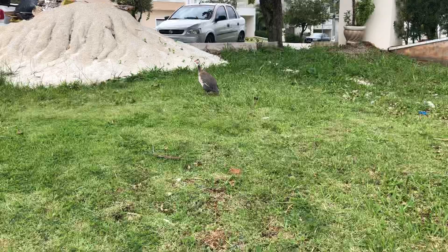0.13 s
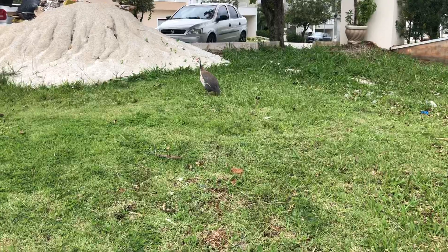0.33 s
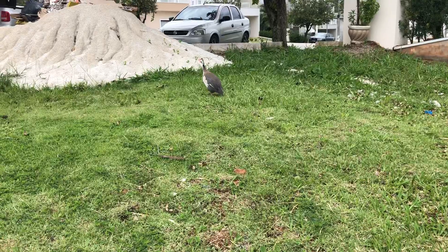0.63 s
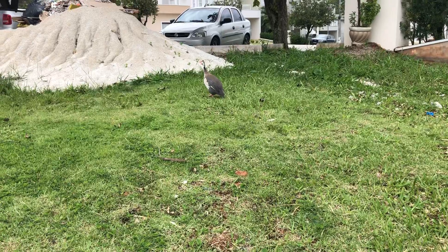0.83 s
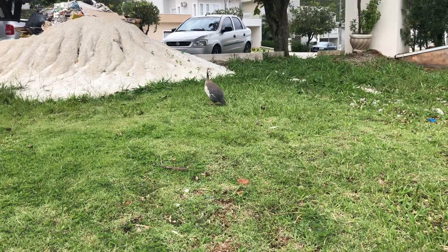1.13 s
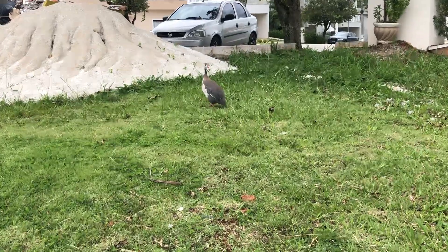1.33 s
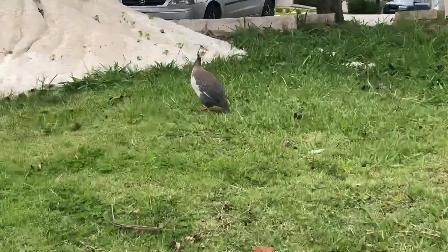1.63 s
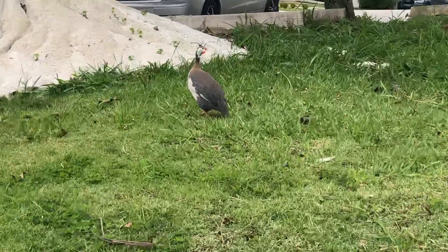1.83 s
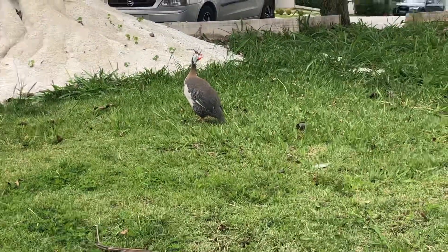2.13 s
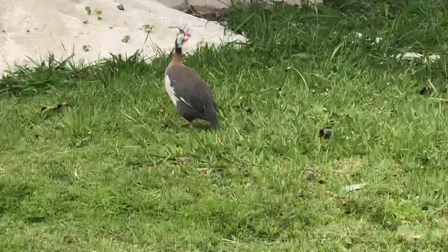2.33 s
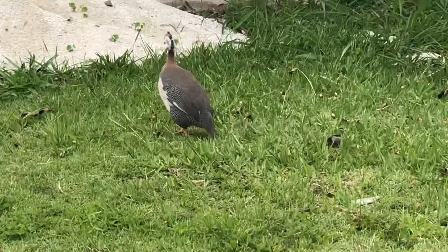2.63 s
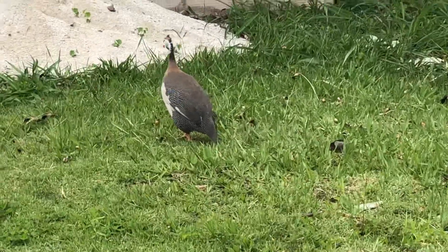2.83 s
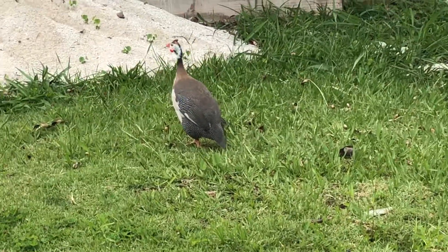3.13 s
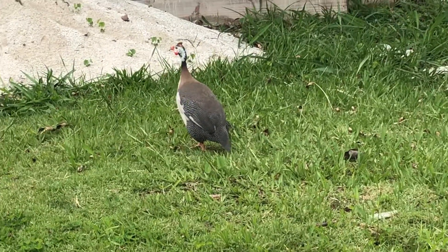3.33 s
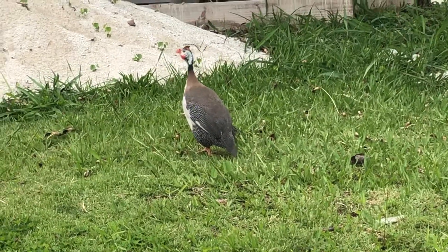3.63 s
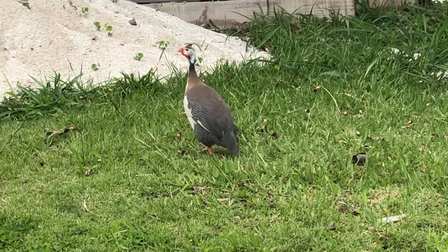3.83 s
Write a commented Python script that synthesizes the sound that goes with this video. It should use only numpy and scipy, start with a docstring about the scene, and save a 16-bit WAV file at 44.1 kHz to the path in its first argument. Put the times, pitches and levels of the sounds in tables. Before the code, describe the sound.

A guinea fowl repeats a hoarse two-part call, short then long and louder, on a lawn outdoors.

```python
"""A guinea fowl on a lawn calls five times. Two voices, each a harmonic tone, open the call with a short
hoarse note; faint peeps and thin squeaks follow, then a long loud note: a clear tone that swells, then breaks
into a rasp of pulses ringing throat resonances, joined by a lower voice. Wall echoes and a scattered tail follow.
Noise-band lisps and two faint pips come from a far small bird in the later part.
Traffic, shaped noise with an engine hum of narrow noise bands, rumbles throughout."""
import sys
import numpy as np
from scipy import signal
from scipy.fft import rfft, irfft
from scipy.io import wavfile
from scipy.ndimage import uniform_filter1d

SR = 44100
rng = np.random.default_rng(int(sys.argv[2]) if len(sys.argv) > 2 else 0)


def log_audio(samples):
    """Write samples as a 16-bit WAV file to the path given in sys.argv[1]."""
    # one column per channel
    frames = np.atleast_2d(samples).T
    # limit to full scale, then quantise
    limited = np.clip(frames, -1, 1)
    pcm = np.round(limited * 32767).astype(np.int16)
    wavfile.write(sys.argv[1], SR, pcm)


N = 176400
NOTE_T = np.arange(SR // 4) / SR  # s, time within one note


def from_db(db):
    """Decibels to gain."""
    return 10 ** (np.asarray(db) / 20)


def rms_one(x):
    """Scale to unit rms."""
    return x / np.sqrt(np.mean(x ** 2) + 1e-20)


def add(out, start_s, x):
    """Mix x in at start_s."""
    i = int(start_s * SR)
    out[i:i + len(x)] += x[:len(out) - i]


def coloured(x, points):
    """Filter x by a curve of (Hz, dB) points, then scale to unit rms."""
    hz, db = np.transpose(points)
    f = np.maximum(np.fft.rfftfreq(len(x), 1 / SR), 1)
    gain = from_db(np.interp(np.log(f), np.log(hz), db))
    return rms_one(irfft(rfft(x) * gain, len(x)))


def band_noise(hz, width_hz, size):
    """Unit-rms noise in a bell-shaped band; around 0 Hz it is a random wander."""
    f = np.fft.rfftfreq(size, 1 / SR)
    bell = np.exp(-2 * ((f - hz) / width_hz) ** 2)
    return rms_one(irfft(rfft(rng.standard_normal(size)) * bell, size))


def resonate(x, hz, width_hz):
    """Two-pole resonance with unit gain at its peak."""
    r = np.exp(-np.pi * width_hz / SR)
    zeros = np.array([1, 0, -1]) * (1 - r * r) / 2
    poles = [1, -2 * r * np.cos(2 * np.pi * hz / SR), r * r]
    return signal.lfilter(zeros, poles, x + 1e-18)


def lowpass(x, cut_hz):
    """Second-order low-pass."""
    return signal.sosfilt(signal.butter(2, cut_hz, fs=SR, output="sos"), x)


def envelope(length_s, attack_s, release_s):
    """Smooth attack, hold, and a release centred on the note's end."""
    rise = np.sin(np.pi / 2 * np.clip(NOTE_T / attack_s, 0, 1)) ** 2
    fall = np.sin(np.pi / 2 * np.clip((length_s - NOTE_T) / release_s + .5, 0, 1)) ** 2
    return rise * fall


ATTACK_S, RELEASE_S = 0.0072, 0.0041
CHIRP_HZ, CHIRP_DB, CHIRP_LEAD_S, CHIRP_S = 2255, -57.5, .009, 0.019

# Short notes. Each row: start in seconds, length in s, upper voice length in s, upper level in dB,
# lower start pitch in Hz, lower level in dB, lower roughness 0-1, rasp level in dB.
SHORT_NOTES = [(0.274, 0.033, 0.031, -42, 946, -48.5, .8, -42),
               (1.062, 0.036, 0.021, -42, 961, -41.5, 0, -44.5),
               (1.873, 0.045, 0.039, -39, 946, -47.5, 0.47, -42),
               (2.724, 0.039, 0.026, -40, 956, -48.5, 0.66, -41.5),
               (3.507, 0.039, 0.014, -38.5, 941, -38.5, 0.31, -48)]
# Long notes. Each row: start in seconds, break after s, length in s, clear pitch and level midway to the break
# in Hz and dB, pitch at the break in Hz, level after it in dB, lower voice in dB, rasp in dB before its offset,
# hiss in dB from the break on, start offset in dB (hiss, rasp and undertone).
LONG_NOTES = [(0.443, 0.033, 0.086, 1603, -31, 1481, -36.5, -46, -38.5, -55, -4),
              (1.235, 0.048, 0.097, 1591, -32.5, 1619, -35.5, -38.5, -37, -55, -7),
              (2.058, 0.045, 0.095, 1605, -29.5, 1480, -29.5, -42.5, -38.5, -51.5, -4),
              (2.913, .030, .090, 1614, -28, 1622, -32.5, -37.5, -37.5, -50.5, -3),
              (3.681, .054, .100, 1622, -28.5, 1657, -37.5, -37, -37, -49.5, -13)]
# Thin squeaks around the long notes' onsets.
# Each row: start in seconds, length in s, start pitch in Hz, glide in Hz per s, level in dB.
SQUEAKS = [(.433, 0.02, 2835, 0, -52.5), (1.194, 0.017, 2810, 0, -58), (1.219, 0.022, 2800, 500, -56.5),
           (2.009, 0.009, 2827, 8, -53.5), (2.045, 0.018, 2840, 4, -54), (2.893, 0.027, 2880, -500, -51.5),
           (3.672, .018, 3160, 12000, -57)]
# Soft peeps between short and long notes. Each row: as for the squeaks.
PEEPS = [(.388, 0.014, 1290, 0, -58.5), (1.202, 0.013, 1590, -1000, -47.5),
         (1.203, 0.028, 1276, -3000, -53.5), (2.015, .016, 1630, -17000, -46.5),
         (2.861, 0.011, 1320, -9000, -52), (2.901, 0.013, 1440, 0, -43.5),
         (3.630, 0.016, 1345, -3000, -58.5)]
# Harmonics of squeak and peep, from the first up. Each entry: relative level in dB.
SQUEAK_HARMONICS = [3.5, -4, -21.5, -31]
PEEP_HARMONICS = [0, -26, -27, -22]


def guinea_fowl():
    """Place the bird's notes; chirps, squeaks and peeps are single short membrane tones."""
    out = np.zeros(N)
    for start_s, *note in SHORT_NOTES:
        chirp = voice(CHIRP_HZ, 0, [0], rough=0.27) * envelope(CHIRP_S, ATTACK_S, RELEASE_S)
        add(out, start_s - CHIRP_LEAD_S, from_db(CHIRP_DB) * chirp)
        add(out, start_s, short_note(*note))
    for start_s, *note in LONG_NOTES:
        add(out, start_s, long_note(*note))
    for table, harmonics in ((SQUEAKS, SQUEAK_HARMONICS), (PEEPS, PEEP_HARMONICS)):
        for start_s, length_s, hz, glide_hz_per_s, db in table:
            tone = voice(hz, glide_hz_per_s, harmonics, rough=0.087)
            add(out, start_s, from_db(db) * tone * envelope(length_s, attack_s=0.0056, release_s=0.014))
    return out


LOWER_HZ, LOWER_RISE_HZ_PER_S, LOWER_LEAD_S = 969, 800, 0.003154
CLEAR_RISE_HZ_PER_S, CLEAR_SWELL_DB_PER_S = 450, 66
BROKEN_RISE_HZ_PER_S, BROKEN_EARLY_END_S = 900, 0.0059
RASP_OFFSET_DB, HISS_RELEASE_S = -2.5, 0.061
CATCH_HZ, CATCH_DB, CATCH_S = 1239, -38, 0.012  # brief undertone; level before the start offset

# Harmonics of the clear tone, upper and lower voice, from the first up. Each entry: relative level in dB.
CLEAR_HARMONICS = [0.5, -25, -26, -42, -54, -46, -52]
UPPER_HARMONICS = [1.5, -27, -28.5, -38.5, -52, -42.5, -49]
LOWER_HARMONICS = [-0.5, -7.5, -21.5, -35, -35.5, -34.5]


def long_note(break_s, length_s, clear_hz, clear_db, broken_hz, broken_db, lower_db, rasp_db, hiss_db, start_db):
    """A clear tone swells and roughens until it breaks; the lower voice and the rasp then take over."""
    out = np.zeros(len(NOTE_T))
    rasp, hiss = rattle()
    strain = np.clip(NOTE_T / break_s, 0, 1)
    after_s = length_s - break_s

    swell = from_db(clear_db + CLEAR_SWELL_DB_PER_S * break_s * (strain - .5))
    start_hz = clear_hz - CLEAR_RISE_HZ_PER_S * break_s / 2
    clear_rough = .06 + .16 * strain ** 2
    clear = voice(start_hz, CLEAR_RISE_HZ_PER_S, CLEAR_HARMONICS, rough=clear_rough, flutter_hz=520)
    add(out, 0, swell * clear * envelope(break_s + 0.0013, attack_s=0.0092, release_s=0.0031))

    undertone = voice(CATCH_HZ, 0, [0], rough=0.4) * envelope(CATCH_S, attack_s=0.0028, release_s=0.0076)
    add(out, 0, from_db(CATCH_DB + start_db) * undertone)

    broken = voice(broken_hz, BROKEN_RISE_HZ_PER_S, UPPER_HARMONICS, rough=.45)
    broken *= envelope(after_s - BROKEN_EARLY_END_S, ATTACK_S, release_s=0.0058)
    add(out, break_s, from_db(broken_db) * broken)

    lower = voice(LOWER_HZ, LOWER_RISE_HZ_PER_S, LOWER_HARMONICS, rough=0.091)
    lower *= envelope(after_s + LOWER_LEAD_S, attack_s=0.014, release_s=RELEASE_S)
    add(out, break_s - LOWER_LEAD_S, from_db(lower_db) * lower)

    # offset weight falls from 1.5 at the start to 0.5 at the break
    rasp_gain = from_db(rasp_db + (RASP_OFFSET_DB + start_db) * (1.5 - strain ** 2))
    add(out, 0, rasp_gain * rasp * envelope(length_s, ATTACK_S, release_s=0.025))
    hiss_gain = from_db(hiss_db + start_db * (1 - strain))
    add(out, 0, hiss_gain * hiss * envelope(length_s, ATTACK_S, HISS_RELEASE_S))
    return out


SHORT_UPPER_HZ = 1598
SHORT_HISS_DB, SHORT_HISS_CUT_HZ = -60, 7000  # level before the envelope


def short_note(length_s, upper_length_s, upper_db, lower_hz, lower_db, lower_rough, rasp_db):
    """Both voices sound together over a rasp and a soft, duller hiss; the upper may drop out early."""
    rasp, hiss = rattle()
    hiss = lowpass(hiss, SHORT_HISS_CUT_HZ)
    upper = from_db(upper_db) * voice(SHORT_UPPER_HZ, 0, UPPER_HARMONICS, rough=.35)
    upper *= envelope(upper_length_s, attack_s=.006, release_s=0.016)
    lower = from_db(lower_db) * voice(lower_hz, -300, LOWER_HARMONICS, rough=lower_rough)
    body = lower + from_db(rasp_db) * rasp + from_db(SHORT_HISS_DB) * hiss
    return upper + body * envelope(length_s, attack_s=0.016, release_s=0.01)


def voice(hz, glide_hz_per_s, harmonics, rough, jitter=0.037, shimmer_db=3, flutter_hz=420):
    """One vibrating membrane; roughness shakes its pitch and strength."""
    size = len(NOTE_T)
    pitch_hz = (hz + glide_hz_per_s * NOTE_T) * (1 + jitter * rough * band_noise(0, flutter_hz, size))
    phase = 2 * np.pi * np.cumsum(pitch_hz) / SR
    tone = sum(from_db(db) * np.sin((k + 1) * phase) for k, db in enumerate(harmonics))
    return rms_one(tone * from_db(shimmer_db * rough * band_noise(0, flutter_hz, size)))


RATTLE_PER_S, RATTLE_RISE_HZ_PER_S, RATTLE_JITTER = 312, 300, .035
BUZZ_SHARE = 0.54  # pulses mixed into the air noise

# Throat resonances under the rasp. Each row: frequency in Hz, width per pass in Hz, level in dB.
THROAT = [(363.4, 97, -11.5), (943, 124, -10), (1295, 203, 3), (1488, 123, -3), (1698, 160, -5),
          (1937, 57, -13.5), (2294, 230, -13)]
# Spectrum of the voice's hiss. Each row: frequency in Hz, relative filter gain in dB.
HISS = [(1000, -39), (2000, 2), (2600, 3), (2900, 4.5), (3100, -8), (3350, 1.5), (3900, -14), (4200, -9),
        (4480, -5), (4950, 3), (5500, 3), (6350, 0), (6800, -10), (8800, -23), (10200, -8), (11500, -13),
        (12800, -29), (15500, -22)]


def rattle(hiss_depth=0.43, uneven=0.63):
    """Uneven, quickening pulses ring the throat and chop the rushing air: returns evened rasp and hiss."""
    size = len(NOTE_T)
    rate_hz = RATTLE_PER_S + RATTLE_RISE_HZ_PER_S * NOTE_T
    rate_hz = rate_hz * (1 + RATTLE_JITTER * band_noise(0, 500, size))
    cycles = rng.random() + np.cumsum(rate_hz) / SR
    pulses = np.diff(np.floor(cycles), prepend=0) * (1 + uneven * rng.standard_normal(size))

    rasp = np.zeros(size)
    for k, (hz, width_hz, db) in enumerate(THROAT):
        ring = resonate(resonate(pulses, hz, width_hz), hz, width_hz)
        rasp += (-1) ** k * from_db(db) * ring  # neighbours in opposite polarity
    rasp = rms_one(rasp)
    rasp = rasp / np.sqrt(uniform_filter1d(rasp ** 2, size=700) + 0.0084)  # even the level

    air = rng.standard_normal(size) * (1 + hiss_depth * np.cos(2 * np.pi * cycles))
    return rasp, coloured(air + BUZZ_SHARE * rms_one(pulses), HISS)


GROUND_DIP_HZ, GROUND_DIP_WIDTH_HZ, GROUND_DIP_DEPTH = 2120, 330, 0.55


def lawn_bounce(x):
    """The bounce off the lawn cancels part of the direct sound in one band."""
    return x - GROUND_DIP_DEPTH * resonate(x, GROUND_DIP_HZ, GROUND_DIP_WIDTH_HZ)


NEAR_WALL_S, NEAR_WALL_DB, NEAR_WALL_HZ, NEAR_WALL_WIDTH_HZ = 0.025, -4.5, 1978.5, 280  # width per pass


def near_wall(x):
    """One early echo, narrowed by two resonance passes to about the band that the lawn cancels."""
    out = np.zeros(N)
    echo = resonate(x, NEAR_WALL_HZ, NEAR_WALL_WIDTH_HZ)
    echo = resonate(echo, NEAR_WALL_HZ, NEAR_WALL_WIDTH_HZ)
    add(out, NEAR_WALL_S, from_db(NEAR_WALL_DB) * echo)
    return out


SCATTER_DELAY_S = 0.015

# Wall echoes. Each row: delay in seconds, level in dB.
ECHOES = [(.029, -20), (.037, -18), (.098, -28.5), (.135, -27.5), (.21, -35.5)]
# Scattered sound. Each row: frequency in Hz, tail level before the band filter in dB, t60 in s.
SCATTER = [(405, -15, 0.67), (1009, -19, 0.91), (1580, -20.5, 0.72), (2190, -12.5, 0.84), (3200, -4, 0.3),
           (5460, -10.5, 0.51), (11000, -20, .3)]


def garden(x):
    """A few wall echoes and a scattered noise tail that dies band by band."""
    t = np.arange(SR) / SR
    response = np.zeros(SR)
    for delay_s, db in ECHOES:
        response[int(delay_s * SR)] += from_db(db)
    hz, level_db, t60_s = np.transpose(SCATTER)
    edges_hz = np.geomspace(250, 16000, 13)
    for low_hz, high_hz in zip(edges_hz, edges_hz[1:]):
        centre_hz = np.sqrt(low_hz * high_hz)
        decay = from_db(-60 * t / np.interp(centre_hz, hz, t60_s))
        tail = rng.standard_normal(SR) * decay * (t > SCATTER_DELAY_S)
        tail *= from_db(np.interp(centre_hz, hz, level_db)) / np.sqrt(np.sum(tail ** 2))
        band = signal.butter(2, [low_hz, high_hz], "band", fs=SR, output="sos")
        response += signal.sosfilt(band, tail)
    return signal.fftconvolve(x, response)[:N]


LISP_HZ, LISP_WIDTH_HZ = 6920, 930

# Lisps. Each row: start in seconds, length in s (notes are cut at 0.25 s), level in dB.
LISPS = [(2.442, 0.095, -74.5), (3.377, 0.34, -81.5), (3.876, 0.13, -79)]
# Faint distant pips. Each row: start in seconds, pitch in Hz, level in dB.
PIPS = [(2.566, 2520, -65), (2.635, 2180, -63)]


def small_bird():
    """Far away: lisps of high band noise and two pips of a single wavering sine."""
    out = np.zeros(N)
    for start_s, length_s, db in LISPS:
        lisp = band_noise(LISP_HZ, LISP_WIDTH_HZ, len(NOTE_T))
        add(out, start_s, from_db(db) * lisp * envelope(length_s, attack_s=0.028, release_s=.04))
    for start_s, hz, db in PIPS:
        pip = voice(hz, 0, [0], rough=.5)
        add(out, start_s, from_db(db) * pip * envelope(length_s=0.0076, attack_s=.003, release_s=.006))
    return out


TRAFFIC_DB = -55.5

# Rumble spectrum. Each row: frequency in Hz, relative filter gain in dB.
TRAFFIC = [(20, -24.5), (36, -25), (48, -4), (62, 2.5), (80, -5.5), (120, -10), (170, -15), (260, -17),
           (420, -19), (650, -24), (1200, -25.5), (2200, -34), (4000, -40.5), (8000, -47), (15500, -52)]
# Hum of distant engines. Each row: frequency in Hz, level before the swell in dB.
HUM = [(61.5, -61.5), (120, -68), (441, -77)]
# Swell of the hum. Each row: time in seconds, gain in dB.
HUM_LEVEL = [(0, 0), (.6, 1), (1.1, -1), (1.8, 0), (2.1, -7), (2.55, -7), (2.8, 3), (3.3, 4), (4, -1)]


def traffic():
    """Steady shaped noise plus engine hum: narrow noise bands that waver and swell."""
    rumble = from_db(TRAFFIC_DB) * coloured(rng.standard_normal(N), TRAFFIC)
    hum = sum(from_db(db) * band_noise(hz, width_hz=5.9, size=N) for hz, db in HUM)
    swell = from_db(np.interp(np.arange(N) / SR, *np.transpose(HUM_LEVEL)))
    return rumble + swell * hum


def scene():
    """The bird heard across the lawn, its echoes and the background."""
    bird = guinea_fowl()
    echoes = near_wall(bird) + garden(bird)
    return (lawn_bounce(bird) + echoes + small_bird() + traffic())[None]


CUTOFF_HZ = 15700


def record(dry):
    """A steep elliptic low-pass cuts the top."""
    return signal.sosfilt(signal.ellip(12, .1, 80, CUTOFF_HZ, fs=SR, output="sos"), dry)


dry = scene()
out = record(dry)
log_audio(out)
```